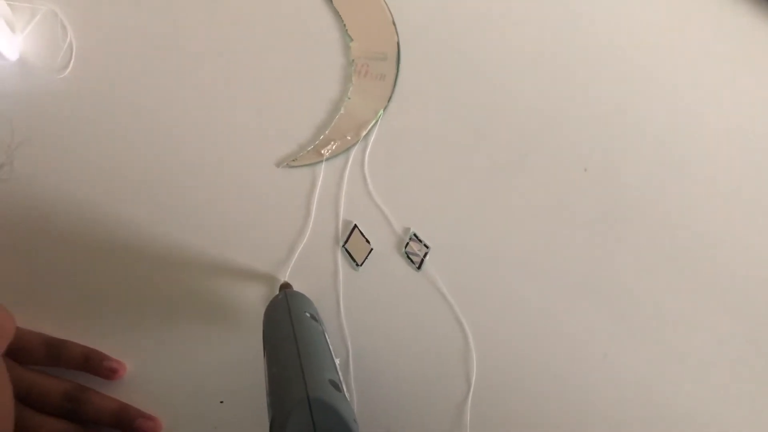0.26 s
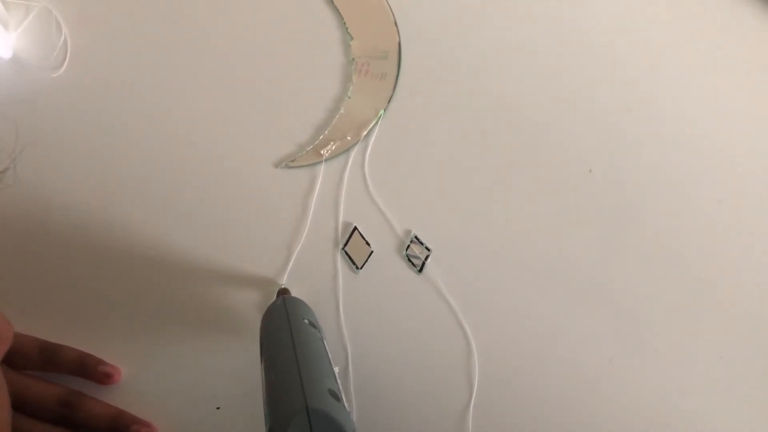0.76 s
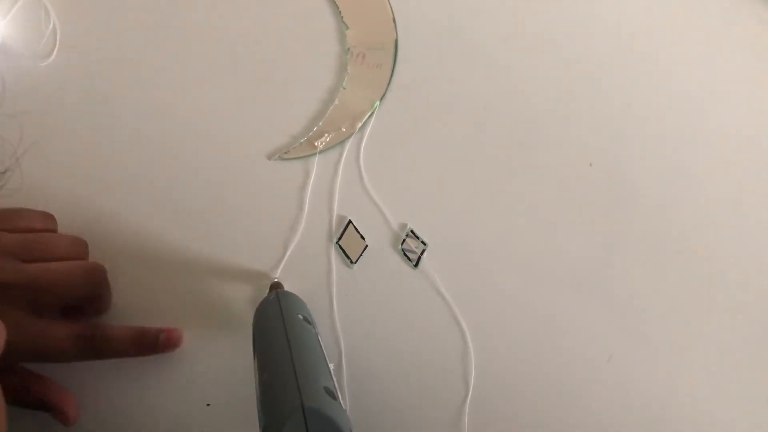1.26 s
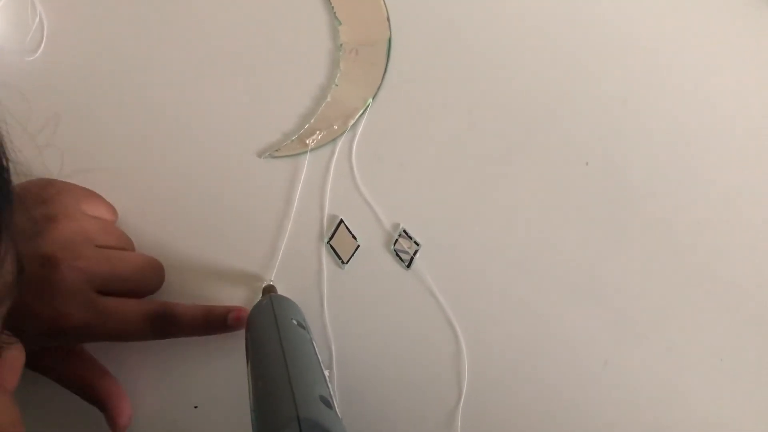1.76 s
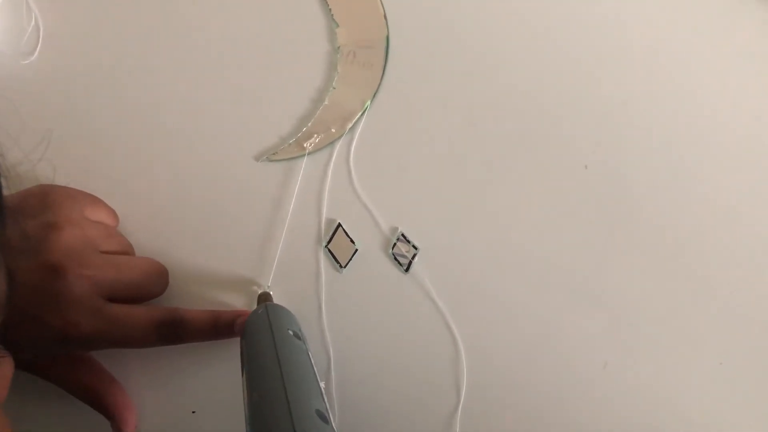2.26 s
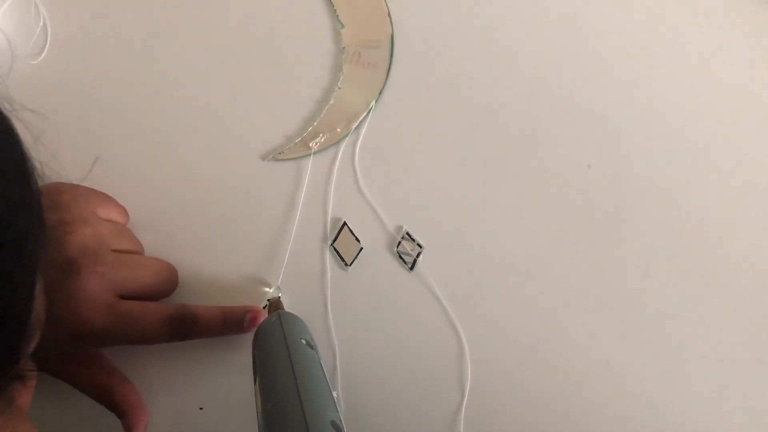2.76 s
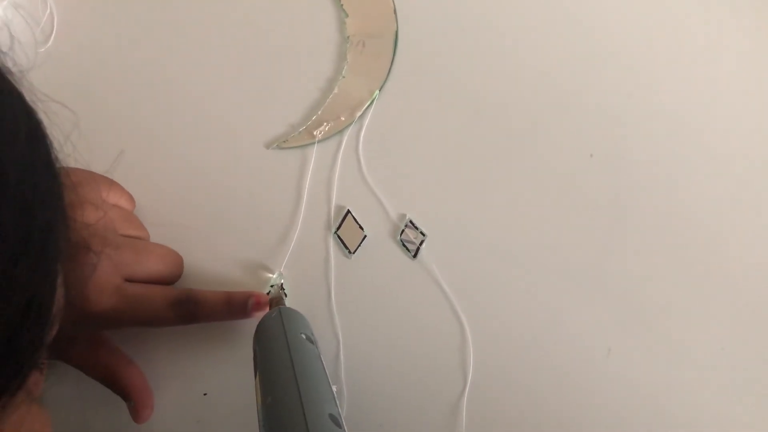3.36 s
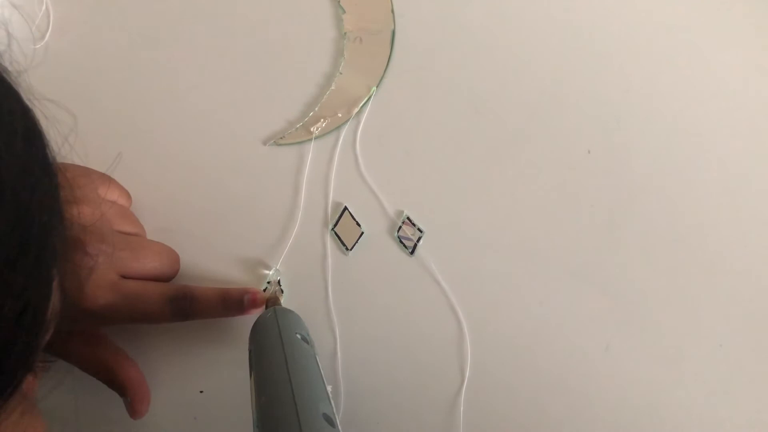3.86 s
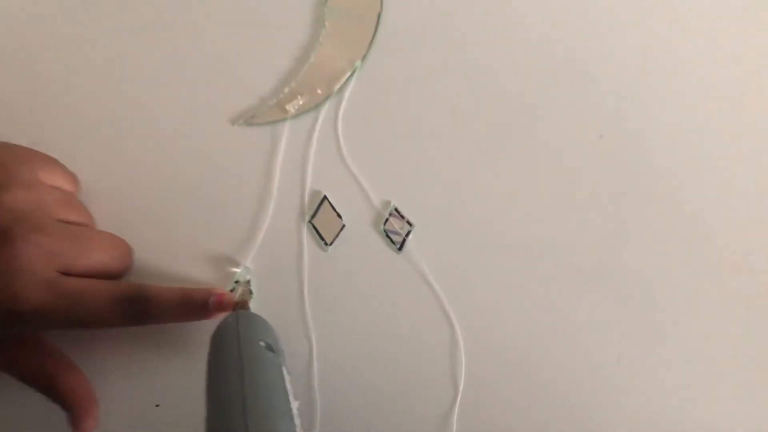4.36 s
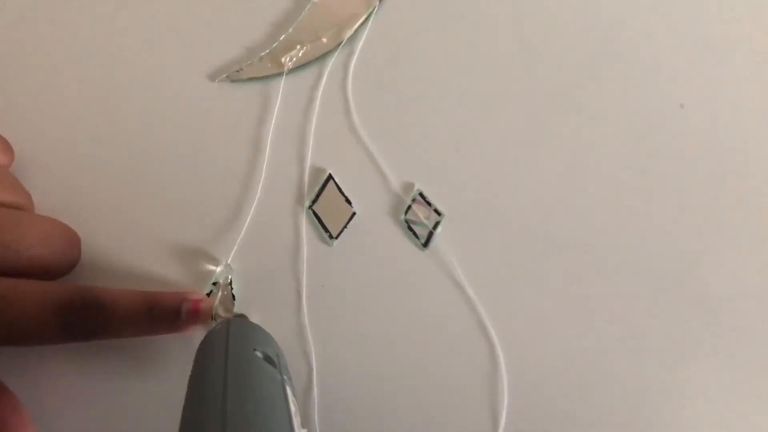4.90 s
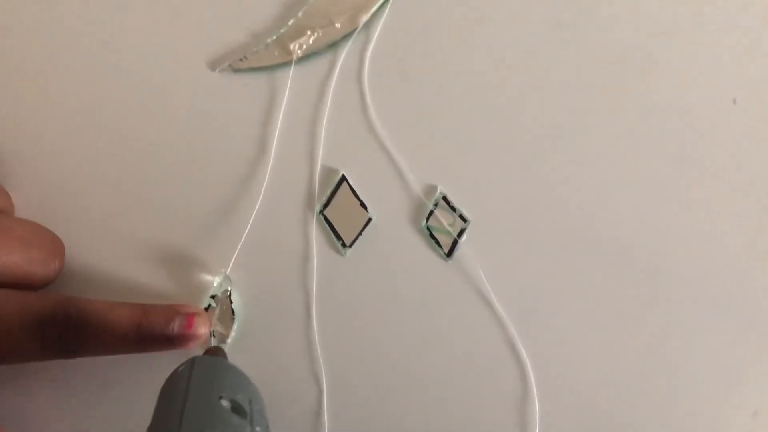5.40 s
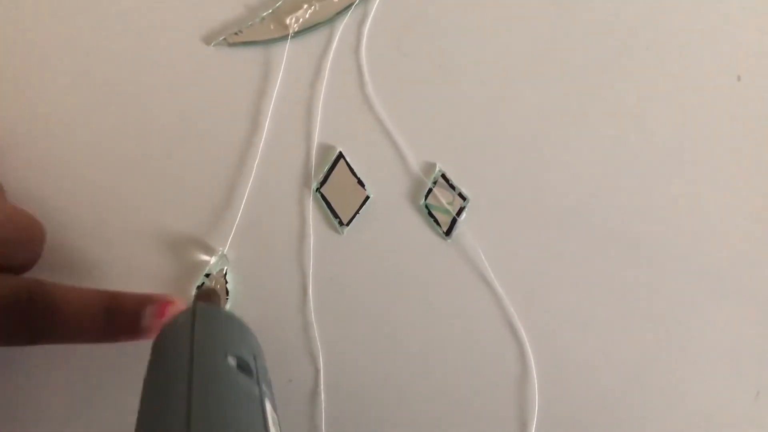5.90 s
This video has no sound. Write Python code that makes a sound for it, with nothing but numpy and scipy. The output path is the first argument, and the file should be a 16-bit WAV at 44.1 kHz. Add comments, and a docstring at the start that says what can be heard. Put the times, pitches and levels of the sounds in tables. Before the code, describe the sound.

A quiet room with low, steady hiss and a distant wall clock ticking very faintly once a second. A soft bump comes at about 0.4 seconds. At 1 second a plastic glue gun clicks close to the microphone, followed by a short, grainy scrape, a swish of skin, small clicks and dull knuckle thumps on a wooden table, fading by 1.8 seconds. Little happens until 4.2 seconds, when the trigger gives a quick cluster of sharp clicks, then lighter ones with muffled finger rubbing. At about 4.9 seconds the gun lands on the table with one hard knock, the loudest sound, with a short room tail and a brief dip in level afterward. From 5.2 seconds to the end, just past 6, come scattered plastic clicks, soft wooden thumps and dry rubbing.

```python
"""Sharp plastic clicks, dull wooden thumps and dry rubbing, close up in a quiet room, with one hard knock.
A glue gun is worked over a wooden table: its trigger clicks ring the housing, knuckles thump the top,
a hand slides and scrapes with grainy friction, and the gun lands hard once. A wall clock ticks far off.
The phone microphone's gain control ducks after the loud hits."""
import sys
import numpy as np
from scipy import signal
from scipy.fft import rfft, irfft
from scipy.io import wavfile
from scipy.ndimage import uniform_filter1d

SR = 44100
rng = np.random.default_rng(int(sys.argv[2]) if len(sys.argv) > 2 else 0)


def to_wav(sig):
    """Store sig (one row per channel, or 1-D mono) as 16-bit WAV at the path in sys.argv[1].

    Samples outside -1..1 are clipped; the rate is SR.
    """
    pcm = np.clip(np.atleast_2d(sig), -1, 1) * 32767
    pcm = np.round(pcm).astype(np.int16)
    wavfile.write(sys.argv[1], SR, pcm.T)  # frames by channels


N = 270754


def gain_of(db):
    """Decibels to a gain factor."""
    return 10 ** (np.asarray(db) / 20)


def unit_rms(x):
    """Scales a signal to rms 1."""
    return x / np.sqrt(np.mean(x ** 2) + 1e-20)


def curve_at(points, hz):
    """Reads a breakpoint curve on a log frequency axis."""
    f, value = np.transpose(points)
    return np.interp(np.log(hz + 1), np.log(f + 1), value)


def add(mix, s, sound):
    """Drops a sound into the mix at s seconds."""
    part = mix[round(s * SR):][:len(sound)]
    part += sound[:len(part)]


def coloured(x, spectrum):
    """Shapes a signal with an EQ curve, rms 1."""
    return unit_rms(irfft(rfft(x) * gain_of(curve_at(spectrum, np.fft.rfftfreq(N, 1 / SR))), N))


def ring(modes, seconds, rise_cycles, tune=1, travel_s=0):
    """Dying sines of alternating sign that build up over rise_cycles; bending waves bring the bass late."""
    hz, db, t60 = np.transpose(modes)[:, :, None]
    hz = hz * tune
    sign = np.cos(np.pi * np.arange(len(modes)))[:, None]
    delay = travel_s * np.sqrt(1000 / hz)  # travel_s holds at 1 kHz
    t = np.maximum(np.arange(round(seconds * SR)) / SR - delay, 0)
    rise = 1 - np.exp(-t * hz / rise_cycles)
    return (sign * rise * gain_of(db - 60 * t / t60) * np.sin(2 * np.pi * hz * t)).sum(0)


def room_tone():
    """A steady bed of room tone and microphone hiss; the low end swells a little."""
    spectrum = [(15, -50), (25, -10), (53, 2), (153, -3), (229, -10), (263, -4.5), (317, -10), (384, -9),
                (607, -15), (1070, -19.5), (1260, -21), (2110, -24), (3920, -26), (16000, -33)]  # noise floor: f/Hz, level/dB
    tone = coloured(rng.standard_normal(N), spectrum)
    bass = signal.lfilter(*signal.butter(N=2, Wn=400, fs=SR), tone)
    swell = unit_rms(uniform_filter1d(uniform_filter1d(rng.standard_normal(N), 3000), 3000))
    return gain_of(-47.5) * (tone + (gain_of(0.52 * swell) - 1) * bass)


def table_hit(contact_ms):
    """The table top under one smooth push, peak 1: the longer the contact, the duller the thud."""
    wood_modes = [(95, -10, 0.096), (145.5, -3, 0.075), (178, -8.5, 0.068), (220.5, 0.5, 0.099),
                  (271, -3, 0.041), (344, 6.5, 0.061), (440, -0.5, 0.016), (628, -2, 0.07), (681, 1, 0.042),
                  (760, -1.5, 0.018), (859, 4, 0.026), (1083, -16, 0.035), (1195, 0, 0.019),
                  (1560, -32.5, 0.0084), (1900, -14, 0.036), (2320, -12.5, 0.016), (2700, -12, 0.011),
                  (3490, -8, 0.0078), (3960, -4, 0.0064), (4640, -15, 0.0052), (7550, -20, .005)]  # table top: f/Hz, level/dB, t60/s
    u = np.arange(400) / SR * 1000 / contact_ms
    force = u * np.exp(-u)  # peaks at contact_ms
    sound = np.convolve(ring(wood_modes, seconds=.4, rise_cycles=0.71, travel_s=0.0008), force)
    return sound / abs(sound).max()


def knuckle_thumps():
    """Each blow on the table layers a soft thud of flesh with a hard rap of knuckle."""
    blows = [(0.356, -34, -13), (0.989, -39, -13), (1.216, -26, -8), (1.246, -34, -8), (1.273, -36, -6),
             (1.3, -37, 2.5), (1.319, -33.5, 1.5), (1.624, -31.5, -27), (1.66, -32, -10), (1.735, -32, -6),
             (3.687, -42, -8), (4.277, -43.5, 10.5), (4.627, -41.5, 6.5), (4.833, -24, -11),
             (4.845, -23.5, -23), (4.858, -26, 1), (5.266, -37, 6), (5.35, -41, 11), (5.443, -22, -12.5),
             (5.66, -21.5, -5.5), (5.734, -37.5, 6.5), (5.878, -27, -3.5)]  # t/s, flesh level/dB, knuckle level relative to flesh/dB
    out = np.zeros(N)
    flesh, knuckle = table_hit(contact_ms=1.56), table_hit(contact_ms=0.1)
    for s, db, knuckle_db in blows:
        add(out, s, gain_of(db) * (flesh + gain_of(knuckle_db) * knuckle))
    return out


def wall_clock():
    """Once a second the movement steps; at this distance each step is a smeared burst in the case."""
    case = [(700, -1), (1400, -2.5), (2300, 0.5), (2650, 3.5), (3000, -4), (4400, -7.5), (6500, -15),
            (9000, -25)]  # colour of the clock case: f/Hz, level/dB
    steps = [(-.027, 2), (0, 3.5), (0.011, -0.5)]  # steps within one tick: offset/s, level/dB
    first_s, tick_db, tock_db = 0.829, -51, -3.0  # every second tick is softer
    attack_s, t60_s = 0.0053, 0.22
    t, shape = np.arange(round(.15 * SR)) / SR, np.zeros(N)
    burst = gain_of(-60 * t / t60_s) * (1 - np.exp(-t / attack_s))
    for k, s in enumerate(np.arange(first_s, N / SR, 1)):
        for offset, step_db in steps:
            add(shape, s + offset, gain_of(tick_db + tock_db * (k % 2) + step_db) * burst)
    return shape * coloured(rng.standard_normal(N), case)


def envelope(strokes):
    """Gain over time: each stroke gains 22.5 dB over its rise, holds, and loses as much over its fall."""
    t, gain = np.arange(N) / SR, 0
    for s, db, rise, hold, fall in strokes:
        fade = np.maximum(s - t, 0) / rise + np.maximum(t - s - hold, 0) / fall
        gain = gain + gain_of(db - 22.5 * fade)
    return gain


def friction(spread_db):
    """Grainy noise: every sample is a slip of random size, a few of them large."""
    return rng.standard_normal(N) * gain_of(spread_db * np.minimum(rng.exponential(1, N), 4))


def arm_rumble():
    """The weight of arm and hand rumbles through the table as a stream of soft bumps."""
    strokes = [(1.044, -37.5, 0.29, 0.0091, 0.27), (1.24, -44.5, 0.12, .03, 0.21),
               (1.5, -48.5, 0.2, 0.18, 0.75), (5.24, -40.5, 0.018, .01, 0.23), (5.8, -44, .5, .34, .1)]  # leaning: t/s, level/dB, rise/s, hold/s, fall/s
    bumps_per_s = 200
    bumps = rng.standard_normal(N) * (rng.random(N) < bumps_per_s / SR)
    return envelope(strokes) * unit_rms(signal.fftconvolve(bumps, table_hit(contact_ms=1.34))[:N])


def skin_slide():
    """Skin sliding on the smooth top: a fine, airy swish."""
    strokes = [(.98, -50, .03, 0.099, 0.043), (1.155, -42, 0.17, .01, 0.34),
               (1.314, -27.5, 0.016, 0.0026, 0.037), (1.335, -37, 0.028, .01, 0.23),
               (1.46, -44.5, 0.12, 0.11, 0.093), (4.6, -64, .1, 0.26, .1), (4.859, -39, .006, .002, .006),
               (5.74, -57, 0.34, .03, 0.36), (4.79, -52, .006, .002, .008), (5.56, -58, .015, .04, .12)]  # slides: t/s, treble level/dB, rise/s, hold/s, fall/s
    spectrum = [(180, -10), (300, -20), (478, -2), (528, -24), (994, -6.5), (1280, -17.5), (2610, -10),
                (2930, -12.5), (13500, -12.5), (16000, -7)]  # skin on wood: f/Hz, level/dB
    swish = coloured(friction(spread_db=1.1), spectrum)
    treble = signal.lfilter(*signal.butter(N=2, Wn=8500, btype="high", fs=SR), swish)
    return envelope(strokes) * swish / treble.std()


def finger_rub():
    """Fingers shifting on gun and table: a muffled midrange rub."""
    strokes = [(1.27, -42.5, 0.45, 0.042, 0.14), (1.55, -56.5, 0.19, 0.025, 0.25),
               (4.57, -55, .4, 0.023, 0.25), (4.864, -38.5, 0.059, 0.0018, .005),
               (5.298, -43.5, 0.13, .01, 0.24), (5.58, -50, 0.19, 0.025, 0.33),
               (5.73, -50.5, 0.12, 0.011, 0.39), (6.12, -50, 0.43, .03, .1)]  # shifts of grip: t/s, level/dB, rise/s, hold/s, fall/s
    spectrum = [(290, -33), (500, 3.5), (688, -2), (985, -12), (1550, -5.5), (2780, -17.5), (3440, -15.5),
                (12000, -35), (15600, -64), (22000, -120)]  # colour of the rub: f/Hz, level/dB
    return envelope(strokes) * coloured(friction(spread_db=1.9), spectrum)


def crackle(t, part_db):
    """The noise burst of a click, coloured like the gun's five parts, with a quicker spit of treble."""
    band_hz = [300, 850, 1600, 3000, 6000, 10000, 15500]  # lower edge, centre of each part, upper edge: f/Hz
    body_db, body_t60_s, spit_db, spit_t60_s, attack_s = -8, 0.018, -10, .007, 0.00016
    log_hz = np.log(np.fft.rfftfreq(len(t), 1 / SR) + 1)
    colour_db = np.interp(log_hz, np.log(band_hz), (part_db[0] - 30, *part_db, part_db[-1] - 8))
    noise = unit_rms(irfft(rfft(rng.standard_normal(len(t))) * gain_of(colour_db), len(t)))
    body = gain_of(body_db - 60 * t / body_t60_s) * noise
    spit = gain_of(spit_db - 60 * t / spit_t60_s) * np.diff(noise, n=2, prepend=[0, 0])
    return (body + spit) * (1 - np.exp(-t / attack_s))


def gun_clicks():
    """Trigger and housing clicks ring five parts of the gun, slightly retuned by the grip, over a crackle."""
    # t/s, level/dB, shell f/Hz, catch f/Hz, place struck (0 handle, 4 snap), loss per part away/dB
    clicks = [(1.0065, -17, 1600, 4250, 1.3, 7.5), (1.2187, -27, 1650, 4600, 2.56, 7),
              (1.302, -27.5, 1600, 4670, .8, 8), (1.313, -25.5, 1580, 4670, 7.3, -2),
              (1.66, -41.5, 1550, 5730, 2.4, 7), (1.736, -43, 1470, 6380, 3.1, 9),
              (4.1791, -10, 1844, 6490, 1.86, 4), (4.203, -6, 1650, 6000, 2.42, 7),
              (4.2324, -14.5, 1810, 7400, 3.1, 4.5), (4.277, -16, 1460, 5780, 1.8, 7),
              (4.4252, -29, 1560, 5870, 1.54, 6.5), (4.45, -30, 1500, 4860, 1.36, 7),
              (4.537, -49, 1540, 5290, 2.8, 4), (4.559, -30, 1490, 5000, 1.2, 3),
              (4.5814, -33.5, 1530, 5250, 1.1, 16), (4.588, -29, 1480, 5270, 1.1, 6.5),
              (4.6149, -30.5, 1530, 4950, 2.9, 7), (4.6306, -24.5, 1460, 5440, .7, 9.5),
              (4.8672, -30, 1528, 6060, 4.5, 5), (4.8678, -3.5, 1455, 4000, 0.045, 9.5),
              (4.947, -39, 1500, 4800, 2.5, 6), (5.2398, -40, 1700, 4800, 1.1, 0.5),
              (5.2904, -22.5, 1680, 5070, 1.41, 12.5), (5.3385, -20, 1500, 6330, 2.1, 8),
              (5.359, -24.5, 1530, 4420, 1.36, 20), (5.59, -33.5, 1600, 4220, 1, 10),
              (5.6266, -33, 1580, 5200, 1, 10), (5.661, -37, 1700, 4340, 0.75, 5),
              (5.7542, -31.5, 1670, 6060, 4, 3), (5.7777, -18, 1604, 4430, 1, 11),
              (5.876, -30, 1710, 4650, 5.3, 2.5), (6.0834, -35, 1380, 4280, 3.27, 9)]
    handle = [(733, 2, 0.035), (965, -2.5, 0.052)]  # hollow low modes: f/Hz, level/dB, t60/s
    shell = [(1.001, -1, 0.018), (1.14, -2.5, 0.013)]  # midrange modes: multiple of shell pitch, level/dB, t60/s
    lever = [(2000, 0.5, .011), (2320, 4, 0.02), (2850, 3.9, 0.011), (3356, 1.5, 0.014), (3600, 0.5, 0.014),
             (3750, 2.2, 0.0096)]  # upper midrange modes: f/Hz, level/dB, t60/s
    catch = [(.8, -9, 0.0064), (.9, -12, 0.0061), (0.998, 0.5, 0.0069), (1.11, -15, 0.028),
             (1.23, -19, 0.015)]  # bright modes: multiple of catch pitch, level/dB, t60/s
    snap = [(8880, 13, 0.01), (9360, 14.5, 0.0046), (10540, -8, .006), (11630, -17, 0.0079),
            (12900, 0, 0.0047)]  # top-end modes: f/Hz, level/dB, t60/s
    balance = [-4, -1, -3.5, -1.5, -9]  # how readily each of these five parts sounds: level/dB
    pitch_spread = 0.022
    out, t = np.zeros(N), np.arange(round(.08 * SR)) / SR
    for s, click_db, shell_hz, catch_hz, place, loss_db in clicks:
        part_db = balance - loss_db * abs(np.arange(len(balance)) - place)
        parts = (handle, 1), (shell, shell_hz), (lever, 1), (catch, catch_hz), (snap, 1)
        plastic = 0
        for (modes, pitch), db in zip(parts, part_db):
            tune = pitch * (1 + pitch_spread * rng.standard_normal((len(modes), 1)))
            part = ring(modes, len(t) / SR, rise_cycles=.12, tune=tune, travel_s=0.00037)
            plastic = plastic + gain_of(db) * part / abs(part).max()
        add(out, s, gain_of(click_db) * (plastic / abs(plastic).max() + crackle(t, part_db)))
    return out


def edge_scrape():
    """A hard edge dragged over the top: coarse friction, passed twice through each resonance."""
    strokes = [(1.012, -42, .03, 0.023, 0.059), (1.055, -23.5, 0.048, 0.015, 0.026),
               (1.09, -38.5, 0.039, 0.011, 0.16), (1.31, -45, .012, .015, .04),
               (5.585, -48.5, 0.08, 0.016, .06)]  # drags: t/s, level/dB, rise/s, hold/s, fall/s
    resonances = [(890, 2000, 0), (1320, 1100, 6.5), (1800, 570, 1.5), (2490, 130, -9), (2970, 130, -8),
                  (4210, 280, 6.5), (4730, 310, -1), (5790, 480, 0), (6900, 310, -20), (8340, 910, -15),
                  (9900, 730, -18)]  # colour of the rasp: f/Hz, width/Hz, level/dB
    grit, rasp = friction(spread_db=6.0), 0
    for hz, width, db in resonances:
        b, a = signal.iirpeak(hz, hz / width, SR)
        rasp = rasp + gain_of(db) * unit_rms(signal.lfilter(b, a, signal.lfilter(b, a, grit)))
    return envelope(strokes) * unit_rms(rasp)


def gun_landing():
    """The gun lands hard on the table: a tick of first contact, then its weight."""
    contacts = [(4.8669, 2, 0.03), (4.8674, 1, 0.11)]  # t/s, level/dB, contact time/ms
    out = np.zeros(N)
    for s, db, contact_ms in contacts:
        add(out, s, gain_of(db) * table_hit(contact_ms))
    return out


def reverb(x):
    """A short room tail of noise after a 5 ms pre-delay, each band dying at its own speed."""
    decay = [(100, 0.32), (500, 0.3), (2000, 0.36), (6000, 0.21), (16000, 0.086)]  # room decay: f/Hz, t60/s
    taps = rng.standard_normal(SR // 2) * (np.arange(SR // 2) > .005 * SR)
    hz, t, bands = signal.stft(taps, SR, nperseg=256)
    tail = signal.istft(bands * gain_of(-60 * t / curve_at(decay, hz)[:, None]), SR, nperseg=256)[1]
    return signal.fftconvolve(x, tail / np.linalg.norm(tail))[:N]


def scene():
    """Close hits with reverb, dry hand sounds, clock and room tone; the table's reverb send is dulled."""
    clicks = gun_clicks()
    knocks = knuckle_thumps() + gun_landing()
    dull_knocks = signal.lfilter(*signal.butter(N=2, Wn=2200, fs=SR), knocks)
    wet = gain_of(-17.0) * reverb(clicks) + gain_of(-8.5) * reverb(dull_knocks)
    hands = skin_slide() + edge_scrape() + finger_rub() + arm_rumble()
    return (clicks + knocks + wet + hands + wall_clock() + room_tone())[None]


def record(dry):
    """The small microphone drops deep bass, ducks after loud hits, clips on overload and cuts the top end."""
    threshold_db, duck_db_per_db, release_db_per_s, lag_samples = -31.5, 0.26, 36.3, 500
    power_db = 10 * np.log10(abs(uniform_filter1d(dry[0] ** 2, 600)) + 1e-12)
    late_db = np.concatenate([np.full(lag_samples, -90.), power_db[:-lag_samples]])
    release = np.arange(N) * release_db_per_s / SR
    held_db = np.maximum.accumulate(late_db + release) - release  # jumps to each peak, then sinks
    over_db = np.maximum(held_db - threshold_db, 0)
    thin = signal.lfilter(*signal.butter(N=2, Wn=45, btype="high", fs=SR), dry)
    ducked = thin / gain_of(duck_db_per_db * uniform_filter1d(over_db, 400))
    lowpass = signal.firwin(511, cutoff=15850, window=("kaiser", 9), fs=SR)
    return signal.oaconvolve(np.clip(ducked, -1, 1), lowpass[None], "same")


dry = scene()
out = record(dry)
to_wav(out)
```